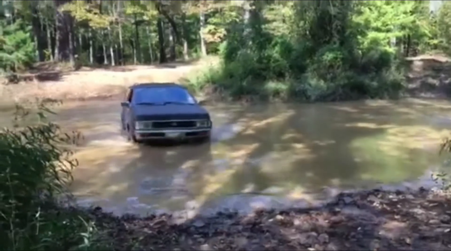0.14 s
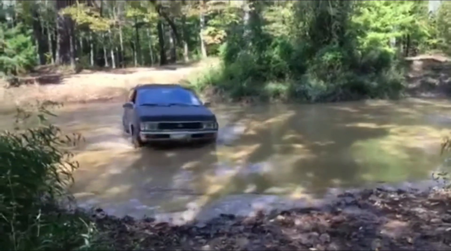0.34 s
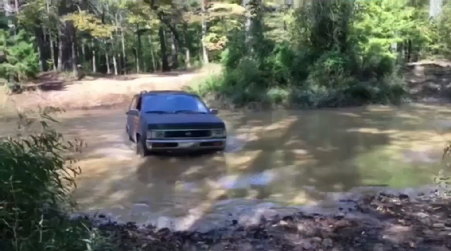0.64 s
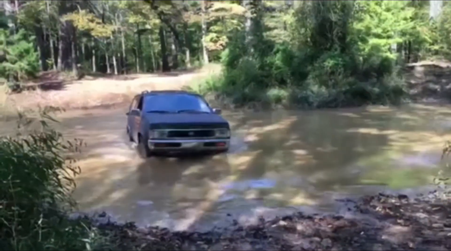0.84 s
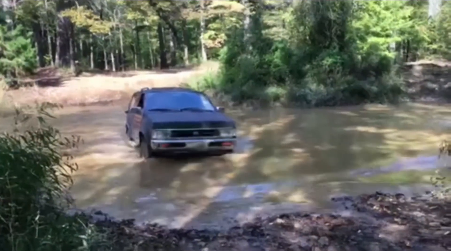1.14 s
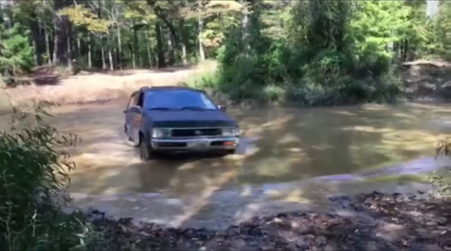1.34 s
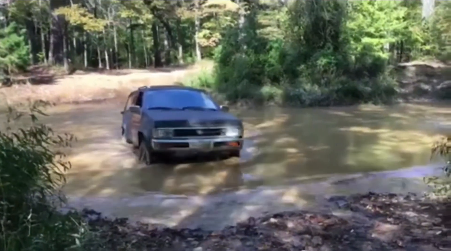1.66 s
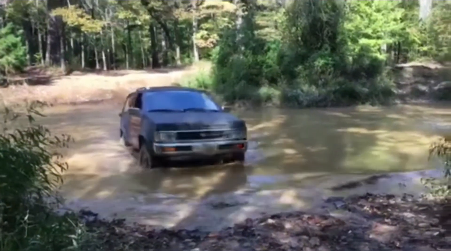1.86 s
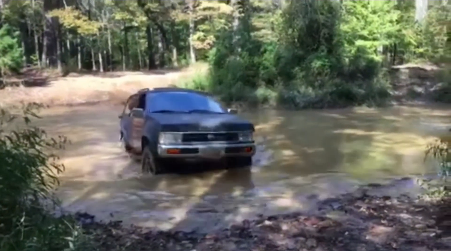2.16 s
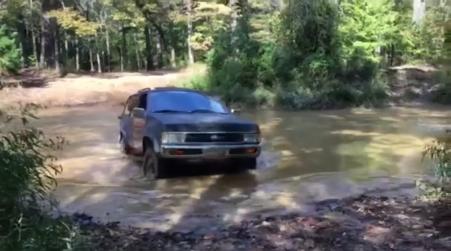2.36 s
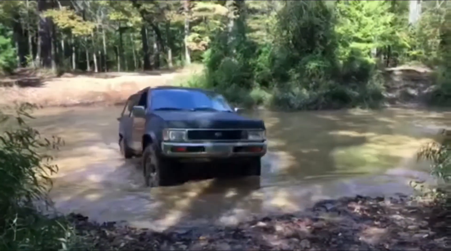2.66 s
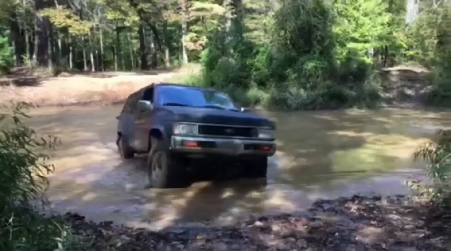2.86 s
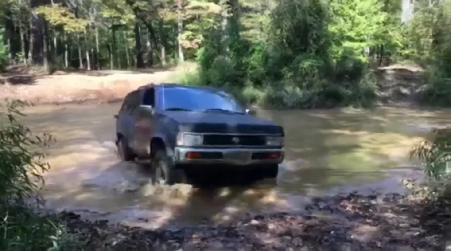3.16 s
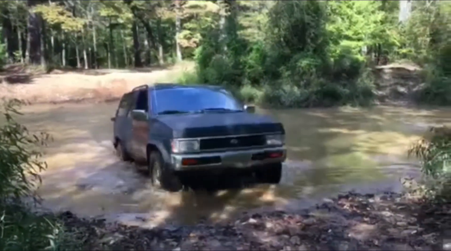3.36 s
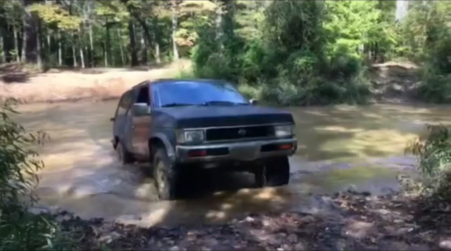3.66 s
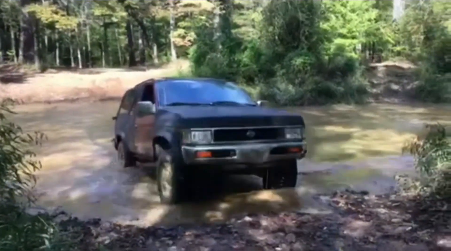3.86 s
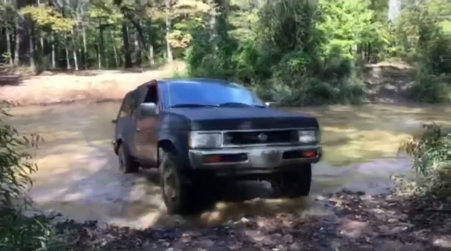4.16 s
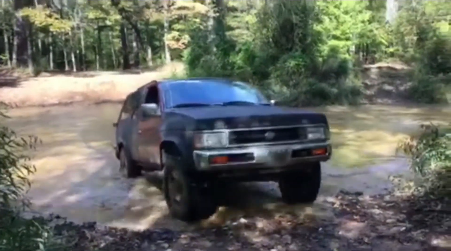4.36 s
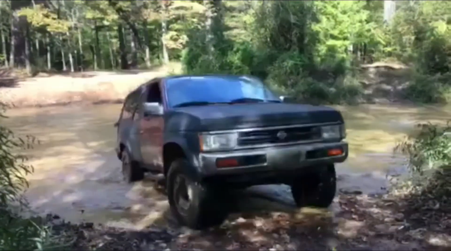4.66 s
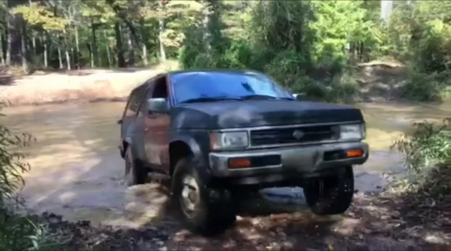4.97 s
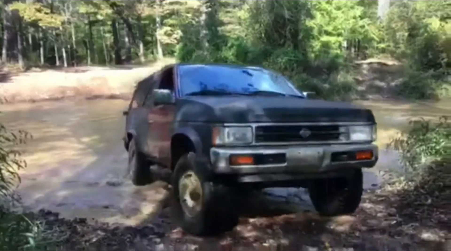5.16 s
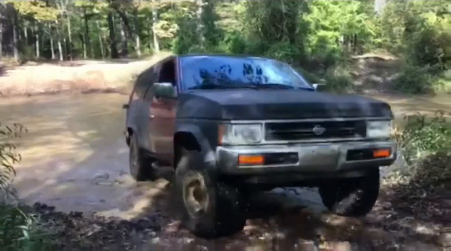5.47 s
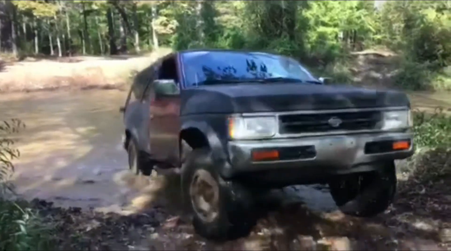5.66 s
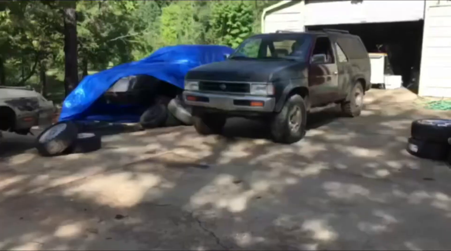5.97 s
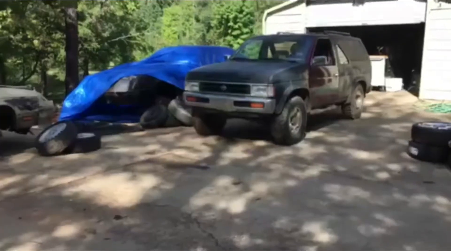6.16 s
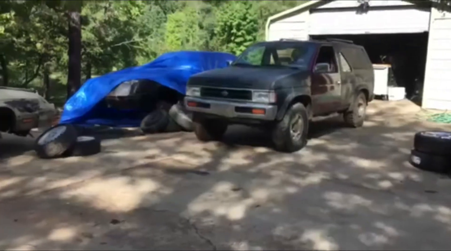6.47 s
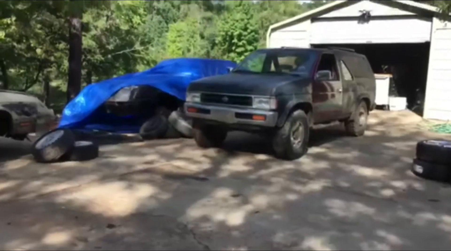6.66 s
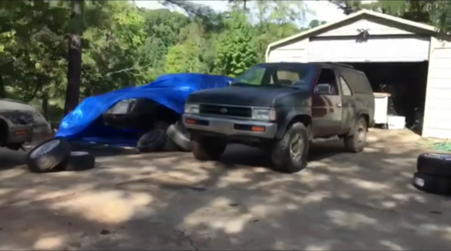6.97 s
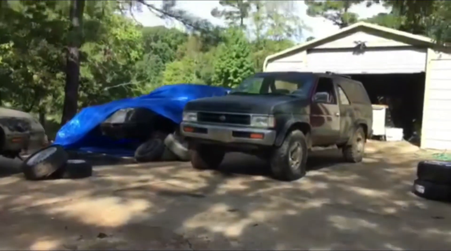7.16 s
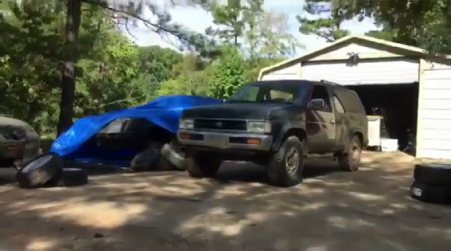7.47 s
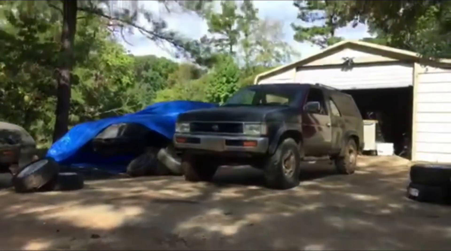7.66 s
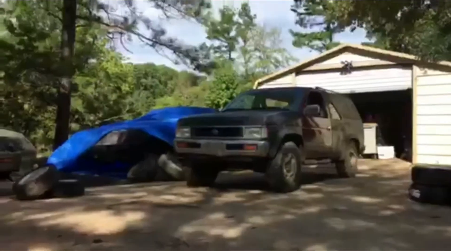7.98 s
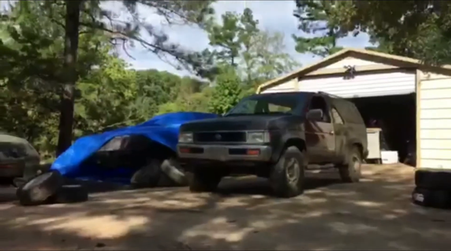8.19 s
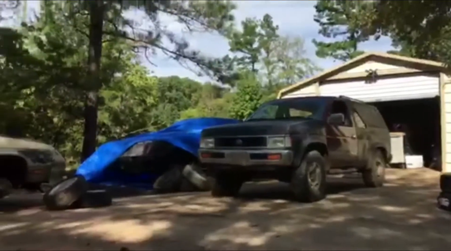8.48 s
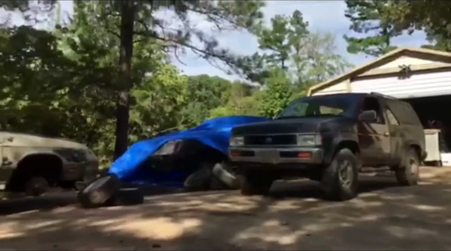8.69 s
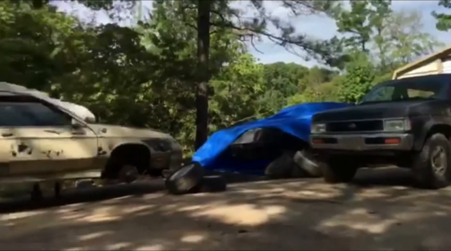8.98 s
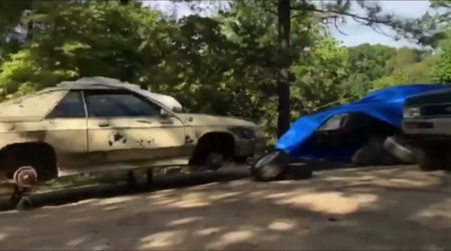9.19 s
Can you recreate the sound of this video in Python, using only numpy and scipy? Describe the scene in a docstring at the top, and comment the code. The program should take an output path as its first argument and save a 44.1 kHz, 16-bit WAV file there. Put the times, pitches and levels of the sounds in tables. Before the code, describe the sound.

Outdoors at a muddy pond, a truck engine drones low under load, its pitch wavering as it climbs toward the microphone. Water hisses and bubbles, a joint squeaks faintly, and splashes build to a heavy wet gulp near the bank. A very brief silence cuts to a yard, where the engine idles in a lumpy pulse with a soft hiss each cycle, light wind on the microphone and a dry twig snap.

```python
"""A six-cylinder truck crawls out of a muddy pond: firing multiples coloured by the exhaust, plus chance kicks
that ring the exhaust box and panels. Filtered noise and ringing bubbles make the wash and splashes, falling
plops a gulp of mud, sagging sines a squeaking joint. After a very short silence the engine idles on a yard:
pulses ring the pipes of two banks and a hiss puffs once a cycle. There, low noise swells as wind on the
microphone and a twig snaps close by as struck resonances."""
import sys
import numpy as np
from scipy import signal
from scipy.io import wavfile
from scipy.ndimage import uniform_filter1d

SR = 44100
rng = np.random.default_rng(int(sys.argv[2]) if len(sys.argv) > 2 else 0)


def unload_audio(sound):
    """Save the sound as a 16-bit wav file, at the path given as the first command line argument."""
    columns = np.transpose(np.atleast_2d(sound))
    # keep every value between -1 and 1, then stretch to whole-number steps
    steps = np.round(np.clip(columns, -1, 1) * 32767)
    wavfile.write(sys.argv[1], SR, steps.astype(np.int16))


N = 411453
TIME = np.arange(N) / SR
WADE_END_S, IDLE_START_S = 5.7948, 5.8414


def from_db(db):
    """Decibels to gain."""
    return 10 ** (np.asarray(db) / 20)


def rms_one(x):
    """Scale to rms 1."""
    return x / np.sqrt(np.mean(x ** 2) + 1e-20)


def in_time(rows):
    """Draw each column of a table as a line over time; the first column is the time."""
    s, *columns = np.transpose(rows)
    return [np.interp(TIME, s, c) for c in columns]


def drift(rate_hz):
    """Slow random movement of rms 1: noise through two equal low-pass poles, drawn at every 40th sample."""
    r = np.exp(-80 * np.pi * rate_hz / SR)
    noise = rng.standard_normal(N // 40 + 2002)
    slow = signal.lfilter([1], [1, -2 * r, r * r], noise)[2000:]   # drop the run-in
    return np.interp(np.arange(N) / 40, np.arange(len(slow)), rms_one(slow))


def resonate(x, hz, width_hz):
    """One ringing resonance with a gain of about 1 on its peak."""
    r = np.exp(-np.pi * width_hz / SR)
    zeros = np.array([1, 0, -1]) * (1 - r * r) / 2
    poles = [1, -2 * r * np.cos(2 * np.pi * hz / SR), r * r]
    return signal.lfilter(zeros, poles, x + 1e-18)


def body(x, modes):
    """Parallel resonances of alternating sign, as in a hollow body; rms 1."""
    rings = [from_db(db) * resonate(x, hz, width_hz) for hz, width_hz, db in modes]
    return rms_one(sum((-1) ** k * ring for k, ring in enumerate(rings)))


def banded_noise(spectrum, patchy_db):
    """Third-octave noise bands that flicker partly together and mostly apart; rms 1."""
    out = 0
    together = drift(7)
    edges = 120 * 2 ** np.arange(0, 6.6, 1 / 3)
    white = rng.standard_normal((2, N))
    hz, db = np.transpose(spectrum)
    for k, (low, high) in enumerate(zip(edges, edges[1:])):
        band_pass = signal.butter(2, [low, high], "band", fs=SR, output="sos")
        band = signal.sosfilt(band_pass, white[k % 2])
        level_db = np.interp(np.log(low * high) / 2, np.log(hz), db)
        out = out + band * from_db(level_db + patchy_db * (0.29 * together + drift(23)))
    return rms_one(out)


def firings(turns, at=0.):
    """Samples where a running count of turns passes the point `at` of a turn."""
    return np.flatnonzero(np.diff(np.floor(turns - at)) > 0)


def add_at(out, start_s, sound):
    """Mix a short sound in from its start time."""
    i = round(start_s * SR)
    out[i:i + len(sound)] += sound


# wind puffs on the microphone: centre_s [s], level_db [dB]
GUSTS = [(5.86, -36), (6.1, -50), (7.35, -60), (7.72, -43), (8.01, -41), (8.22, -42), (8.78, -39),
         (9.0, -50)]
AIR_DB, GUST_S = -46.5, 0.032   # mean level of still air; reach of a puff to either side


def wind():
    """Low rumble of air on the microphone, swelling in short puffs."""
    rumble = rms_one(resonate(resonate(rng.standard_normal(N), 38, 43), 51, 71))
    puffs = sum(from_db(db) * np.exp(-((TIME - s) / GUST_S) ** 2) for s, db in GUSTS)
    return (from_db(AIR_DB + 1.4 * drift(7.0)) + puffs) * rumble


# snaps of the twig: start_s [s], wood_db [dB of drive], edge_db [dB of drive]
TWIG = [(7.6267, -25, -60), (7.6546, -21, -23.5), (7.657, -33, -42)]


def twig():
    """Dry snaps: a fast-fading crackle strikes a woody ring, a dull knock and a bright edge."""
    wood, edge = np.zeros((2, N))
    n = np.arange(60)
    for s, wood_db, edge_db in TWIG:
        crackle = (1 + 0.25 * rng.standard_normal(60)) * np.exp(-n / 2.7)
        add_at(wood, s, from_db(wood_db) * crackle)
        add_at(edge, s, from_db(edge_db) * crackle * (-1) ** (n // 3))   # sign flips brighten it
    ring = resonate(resonate(resonate(wood, 1900, 1800), 2050, 1000), 2050, 1800)
    knock = resonate(resonate(wood, 950, 770), 950, 770)
    bright = resonate(resonate(edge, 5200, 4000), 5100, 2500)
    return 3.0 * knock + 8.0 * ring + 3.0 * bright


# squeaks of the joint: start_s [s], length_s [s], pitch_hz [Hz at the start], level_db [dB, amplitude]
SQUEAKS = [(0.364, 0.066, 1420, -46), (3.317, .015, 1500, -38), (3.338, .055, 1425, -43),
           (3.411, .022, 1440, -39), (3.44, .05, 1440, -39), (3.503, 0.024, 1413, -43),
           (4.18, .15, 1260, -50), (4.49, .15, 1260, -46)]
SQUEAK_SAG_HZ_PER_S, SQUEAK_SPREAD_HZ, SQUEAK_FLUTTER_DB = 420, 20, 3.2


def joint():
    """Squeaking joint: narrow rough tones that sag in pitch and flutter in level."""
    hz, gain = np.zeros((2, N))
    for s, length_s, start_hz, db in SQUEAKS:
        on = (TIME > s) & (TIME < s + length_s)
        hz[on] = start_hz - SQUEAK_SAG_HZ_PER_S * (TIME[on] - s)
        gain[on] = from_db(db)
    phase = 2 * np.pi * np.cumsum(hz + SQUEAK_SPREAD_HZ * drift(29.7)) / SR
    soft_gain = uniform_filter1d(gain, size=300)
    return soft_gain * from_db(SQUEAK_FLUTTER_DB * drift(34)) * np.sin(phase)


# colour of the water hiss: pitch_hz [Hz], level_db [dB per Hz, relative]
WASH = [(280, -4), (480, -31), (571, 3.5), (688, -5.5), (788, -3.5), (1230, -2.5), (1330, -3.5),
        (2290, -8.5), (2660, -13), (3280, -12.5), (4310, -15.5), (4940, -33.5), (5520, -15.5), (8630, -25),
        (9300, -33), (12100, -63), (20500, -120)]


def wash(wash_db):
    """Pushed water: patchy hiss and a crowd of small bubbles, each ringing for a few cycles."""
    sizes = from_db(3.4 * np.minimum(rng.exponential(1, N), 3))
    births = sizes * (rng.random(N) < 900 / SR)   # about 900 bubbles a second
    dealt = rng.integers(0, 20, N)   # one of twenty pitches for each
    pitches_hz = np.geomspace(800, 3600, 20)
    bubbles = sum(resonate(births * (dealt == k), hz, hz / 15.0) for k, hz in enumerate(pitches_hz))
    return from_db(wash_db) * (banded_noise(WASH, patchy_db=1.68) + from_db(-12.5) * rms_one(bubbles))


def ring_plops(rows):
    """Ring bubbles given as (start_s, level_db, pitch_hz): shaky sines, the higher the sooner gone."""
    out = np.zeros(N)
    t = np.arange(SR // 10) / SR
    for s, db, hz in rows:
        wobble = resonate(rng.standard_normal(len(t)), 110, 200)   # the cavity wall shakes
        tone = np.sin(2 * np.pi * hz * t + 0.43 * rms_one(wobble))
        fade_db = t * (407.0 + .5 * hz)
        add_at(out, s, from_db(db - 1.0 - fade_db) * np.minimum(t / 0.0012, 1) * tone)
    return out


# single plops: start_s [s], level_db [dB before the 1 dB trim in ring_plops], pitch_hz [Hz]
PLOPS = [(0.06, -34, 1930), (.122, -36, 1705), (2.984, -31, 642), (3.155, -32, 2160), (3.157, -31, 630),
         (3.24, -30, 667), (3.31, -30, 630), (3.339, -30, 1820), (3.451, -33, 1170), (4.103, -31, 618),
         (4.142, -30, 807), (5.182, -22, 741), (5.207, -20, 2330), (5.315, -25.5, 2050), (5.391, -29, 1310),
         (5.403, -44, 644.4), (5.468, -30, 665.6), (5.72, -33, 1470)]


def plops():
    """Lone bubbles closing in the water."""
    return ring_plops(PLOPS)


GULP_S, GULP_STEP_S, GULP_LOSS_DB = 5.177, .021, 2.2   # start, spacing and loss per plop
GULP_START_HZ, GULP_END_HZ, GULP_FALL_S = 1390, 590, .047


def mud_gulp():
    """Mud sucks at a tyre: six plops, each weaker and lower as the cavity grows."""
    k = np.arange(6)
    late_s = GULP_STEP_S * k
    hz = GULP_END_HZ + (GULP_START_HZ - GULP_END_HZ) * np.exp(-late_s / GULP_FALL_S)
    return ring_plops(zip(GULP_S + late_s, -15 - GULP_LOSS_DB * k, hz))


# sharp slaps of water: start_s [s], level_db [dB before the trim in slaps], centre_hz [Hz]
SLAPS = [(2.4854, -25.5, 3100), (2.94, -23, 3800), (3.152, -37, 3240), (3.5394, -26, 3410),
         (4.629, -22, 2327), (5.198, -23, 2706), (5.222, -30, 3400)]
SLAP_T60_S, SLAP_WIDTH = .06, .35   # 60 dB fade; width of each resonance as share of the centre


def slaps():
    """Short bursts of narrow noise, struck at once and soon gone."""
    out = np.zeros(N)
    t = np.arange(SR // 5) / SR
    for s, db, hz in SLAPS:
        width_hz = SLAP_WIDTH * hz
        burst = rms_one(resonate(resonate(rng.standard_normal(len(t)), hz, width_hz), hz, width_hz))
        level = from_db(db - 13.5 - 60 * t / SLAP_T60_S)
        add_at(out, s, level * np.minimum(t / 0.00079, 1) * burst)
    return out


# splashes: start_s [s], level_db [dB before the spray trim or drop loss], centre_hz [Hz]
SPLASHES = [(2.936, -21.5, 4060), (3.06, -26, 3200), (3.15, -18, 2810), (3.189, -23, 3300),
            (3.321, -21, 2580), (3.537, -23.5, 4265), (4.288, -25, 1792), (4.62, -26, 3440),
            (5.138, -19, 2128), (5.171, -9, 1330), (5.175, -21, 2570), (5.2, -11, 950), (5.21, -15, 2370),
            (5.24, -20, 1290), (5.271, -18, 2120), (5.275, -17, 5400), (5.3, -30, 1860), (5.66, -24, 2415)]
SPLASH_T60_S, DROPS_WITHIN_S, DROP_DB = 0.34, 0.065, -13


def splashes():
    """Bursts of grainy spray that swell quickly and die away, each throwing three ringing drops."""
    out = np.zeros(N)
    t = np.arange(SR // 5) / SR
    thrown = []
    for s, db, hz in SPLASHES:
        spray = rng.standard_normal(len(t)) * from_db(4.1 * np.minimum(rng.exponential(1, len(t)), 6))
        for _ in range(3):
            spray = resonate(spray, hz, 1.5 * hz)
        level = from_db(db - 21.5 - 60 * t / SPLASH_T60_S)
        add_at(out, s, level * np.minimum(t / 0.0018, 1) * rms_one(spray))
        for late, weak, high in rng.random((3, 3)):
            thrown.append((s + DROPS_WITHIN_S * late, db + DROP_DB - 6 * weak, hz * (.75 + 0.314 * high)))
    return out + ring_plops(thrown)


# engine speed at idle: time_s [s], speed [engine cycles per s]
IDLE_SPEED = [(5.84, 7.521), (6.34, 7.662), (6.84, 7.638), (7.34, 7.669), (7.83, 7.74), (8.33, 7.743),
              (8.83, 7.602), (9.33, 7.381)]
# cylinders, banks alternating: firing_point [share of a cycle], level_db [dB, relative]
CYLINDERS = [(.269, 7.8), (.447, 1.9), (.642, -5.3), (.769, 8.2), (.924, -5.1), (1.097, 5.5)]
# pipe resonances: pitch_hz [Hz], width_hz [Hz], drive_1 and drive_2 [signed gain from each bank]
PIPES = [(68.6, 12, -1.3, 1.6), (94.4, 8, 7.1, 4.2), (138, 21, 7.6, 1.5), (186, 28, 2.5, -2.6),
         (189, 8, -9.4, 3.7), (206, 11, -1.2, 5.2), (229, 8, 2.9, 4.7), (276.5, 8, 18.9, -3.9),
         (277, 15, -12, 4.2)]
# leak hiss: pitch_hz [Hz], width_hz [Hz], level_db [dB, relative]
PUFF = [(3300, 340, -1), (6850, 1350, -5), (8620, 450, -5)]
# exhaust box at idle: pitch_hz [Hz], width_hz [Hz], level_db [dB, relative]
IDLE_BOX = [(47, 8.6, -5), (151, 25, -2), (213, 45, -8.5), (278, 40, -11)]
# fan, valve gear and air: pitch_hz [Hz], level_db [dB per Hz, relative]
YARD = [(190, -29), (285, 7), (350, -7.5), (495, -7.5), (569, -9), (1070, -13), (1350, -13), (2540, -23.5),
        (3800, -24.5), (4500, -27.5), (4960, -31), (6940, -32.5), (7650, -37), (8550, -36.5), (9300, -57),
        (12100, -80), (20500, -120)]
BAY_DB, IDLE_THROB_DB = -43, -.8   # engine bay noise; gas turbulence in the box, re bay noise


def idling_engine():
    """Six slightly varying firings a cycle ring the pipes of two banks; a leak puffs once a cycle."""
    speed, = in_time(IDLE_SPEED)
    cycles = np.cumsum(speed * (TIME > IDLE_SPEED[0][0])) / SR
    banks = np.zeros((2, N))
    for k, (point, db) in enumerate(CYLINDERS):
        at = firings(cycles, point)
        banks[k % 2, at] = from_db(db + 2.0 * rng.standard_normal(len(at)))
    pipes = sum(resonate(a * banks[0] + b * banks[1], hz, width_hz) for hz, width_hz, a, b in PIPES)
    silencer = signal.butter(4, 400, fs=SR, output="sos")   # softens each pulse
    exhaust = signal.sosfilt(silencer, pipes)
    since = (cycles - .13) % 1   # cycles since the leak opened
    puff = since ** 2.8 * np.exp(-since / 0.058)
    leak = body(rng.standard_normal(N), PUFF)
    hiss = from_db(-54.0 + 1.1 * drift(2.7)) * puff / puff.max() * leak
    throb = body(rng.standard_normal(N), IDLE_BOX)
    bay = from_db(BAY_DB) * (banded_noise(YARD, patchy_db=1.3) + from_db(IDLE_THROB_DB) * throb)
    return from_db(2.5 + 0.34 * drift(15.0)) * exhaust + hiss + bay


# engine speed under load: time_s [s], bank_firing_rate_hz [Hz]
SPEED = [(0.0, 28.3), (0.23, 29.5), (0.48, 30.08), (0.64, 31.04), (0.95, 30.62), (1.4, 30.96), (1.8, 30.61),
         (2.32, 30.41), (2.4, 29.56), (2.76, 28.86), (2.97, 26.49), (3.06, 27.76), (3.27, 29.55),
         (3.53, 27.13), (3.77, 31.08), (3.84, 31.29), (4.07, 27.55), (4.29, 30.66), (4.4, 30.97),
         (4.68, 28.76), (4.86, 27.1), (5.15, 27.25), (5.35, 24.43), (5.55, 23.34), (5.79, 29.1)]
# clean firing multiples by pitch: pitch_hz [Hz], deep_db, climbing_db, close_db [dB re engine level]
EXHAUST = [(58, -18, -15.5, -12.5), (71.6, -14, -11.5, -14.5), (94.3, -9.5, -8.5, -2.5), (105, -4, -10, -6),
           (125.3, -9.5, -6.5, -17), (142.5, -12, -12, -2), (153, -5.5, -9.5, -13.5), (164, -9.5, -9, -8.5),
           (190.2, -10.5, -13, -9.5), (200, -12.5, -18, -21), (216, -9, -27.5, -22), (225, -14, -26.5, -29),
           (255, -28, -25, -22.5), (278.8, -31.5, -14, -21.5), (295, -26.5, -29.5, -31.5),
           (352, -54, -43, -36), (398, -24, -25.5, -25), (474, -24.5, -38, -32)]
# exhaust box rung by uneven firings: pitch_hz [Hz], width_hz [Hz], level_db [dB, relative]
BOX = [(51.7, 19.4, -2), (96, 46.4, -3), (135.5, 37.6, -2.5), (223, 49, -10), (286, 41, -12.5)]
# droning body panels, floor then bonnet: pitch_hz [Hz], width_hz [Hz]
PANELS = [(410, 70), (690, 122)]
STAGES_S = (2.2, 3.701, 4.6, 5.1)   # deep until, climbing from, climbing until, close from
# panel drone at the start and at the four stage times
FLOOR_DB, BONNET_DB = (-44.5, -43, -41, -46, -45), (-57, -46.5, -44.5, -44, -43)
# for deep, climbing, close: wavering of each multiple, and strength from firing to firing
WAVER_DB, BEAT_SPREAD_DB = (1.2, 1.4, 1.9), (1.3, 1.8, 1.8)
DOWNSWEEP = (.6, -.36, .35)   # radians per multiple squared: bends the phase across the multiples
LOW_WAVER_DB = 2.2   # the multiples under the fifth also flutter quickly
HUM_SHARP_HZ, HUM_SETTLES_S = 24.64, 0.18   # the seventh multiple starts sharp and settles
PHASE_WANDER, PHASE_JITTER = .55, .03   # radians of slow beat shape; radians per multiple
CHANCE_FIRING_DB = -8   # re engine level


def clean_firings(rate):
    """Multiples of the bank firing rate, their levels set by pitch as the exhaust lets them through."""
    turns = np.cumsum(rate) / SR
    clean = np.zeros(N)
    pond = slice(round(WADE_END_S * SR))
    stage = np.interp(TIME[pond], STAGES_S, (0.0082, 0.996, 1, 2))
    shares = [np.maximum(1 - abs(stage - n), 0) for n in range(3)]   # deep, climbing, close
    hz, *stages_db = np.transpose(EXHAUST)
    waver_db, sweep = np.dot(WAVER_DB, shares), np.dot(DOWNSWEEP, shares)
    beat_db = np.dot(BEAT_SPREAD_DB, shares) * drift(15)[pond]
    sharp_hz = HUM_SHARP_HZ * np.exp(-TIME / HUM_SETTLES_S)
    settling = sharp_hz * HUM_SETTLES_S / 7   # in turns
    for k in range(2, 15):
        pitch_hz = (k * rate + sharp_hz * (k == 7))[pond]
        level_db = sum(share * np.interp(pitch_hz, hz, db) for share, db in zip(shares, stages_db))
        level_db = level_db + beat_db + waver_db * drift(3.35)[pond]
        level_db = level_db + LOW_WAVER_DB * (k < 5) * drift(11)[pond]
        angle = 2 * np.pi * k * (turns - settling * (k % 7 == 0))
        angle = angle + PHASE_JITTER * k * drift(5.9) + PHASE_WANDER * drift(0.79)
        clean[pond] -= from_db(level_db) * np.sin(angle[pond] + sweep * (k - 4) ** 2)
    return np.sqrt(2) * clean   # sine levels become rms levels


def panel_drone(kicks):
    """Firings and rattle shake the floor and bonnet, each a broad resonance."""
    rattle = kicks + 0.22 * rng.standard_normal(N)
    out = np.zeros(N)
    for sign, stage_db, (hz, width_hz) in zip((1, -1), (FLOOR_DB, BONNET_DB), PANELS):
        level_db = np.interp(TIME, (0, *STAGES_S), stage_db) + 0.9 * drift(2.4)
        out += sign * from_db(level_db) * rms_one(resonate(rattle, hz, width_hz))
    return out


def loaded_engine(engine_db):
    """Clean firing multiples, plus kicks of chance strength from both banks in the box and panels."""
    rate, = in_time(SPEED)
    clean = clean_firings(rate)
    kicks = np.zeros(N)
    at = firings(2 * np.cumsum(rate) / SR)
    kicks[at] = rng.standard_normal(len(at))
    gas = kicks + 0.095 * rng.standard_normal(N)   # turbulence between the firings
    exhaust = clean + from_db(CHANCE_FIRING_DB) * body(gas, BOX)
    return from_db(engine_db) * exhaust + panel_drone(kicks)


# levels while wading: time_s [s], engine_db [dB], wash_db [dB]
WADE = [(0, -24.5, -46.5), (.4, -23.5, -46), (1, -23.5, -47), (2, -24, -43.5), (2.8, -22.5, -43),
        (3.2, -19.5, -39.5), (3.33, -22.5, -40.5), (3.42, -25, -39.5), (3.8, -21, -41), (4.5, -20.5, -41),
        (5.1, -21, -39), (5.25, -20.5, -34), (5.33, -21, -35.5), (5.36, -23.5, -39), (5.5, -23, -38),
        (5.7, -20.5, -34.5), (5.8, -20, -37)]


def scene():
    """Pond, short silence, yard."""
    engine_db, wash_db = in_time(WADE)
    water = wash(wash_db) + splashes() + slaps() + plops() + mud_gulp()
    pond = loaded_engine(engine_db) + water + joint()
    yard = idling_engine() + wind() + twig()
    yard_fade = np.clip((TIME - IDLE_START_S) / 0.0018, 0, 1)
    return (pond * (TIME < WADE_END_S) + yard * yard_fade)[None]


# dips of the microphone housing: pitch_hz [Hz], width_hz [Hz], depth [0-1]
MIC_DIPS = [(2650, 140, 0.4), (4880, 330, 0.7), (7480, 420, 0.5)]
CUTOFF_HZ = 9200


def record(dry):
    """The microphone housing takes narrow dips out of the sound; a steep low-pass cuts the top."""
    for hz, width_hz, depth in MIC_DIPS:
        dry = dry - np.clip(depth, 0, 1) * resonate(dry, hz, width_hz)
    low_pass = signal.ellip(10, .5, 55, CUTOFF_HZ, fs=SR, output="sos")
    return signal.sosfilt(low_pass, dry)


dry = scene()
out = record(dry)
unload_audio(out)
```